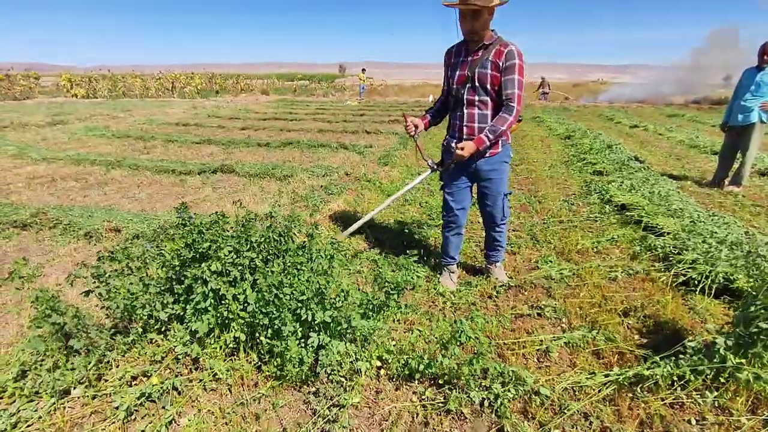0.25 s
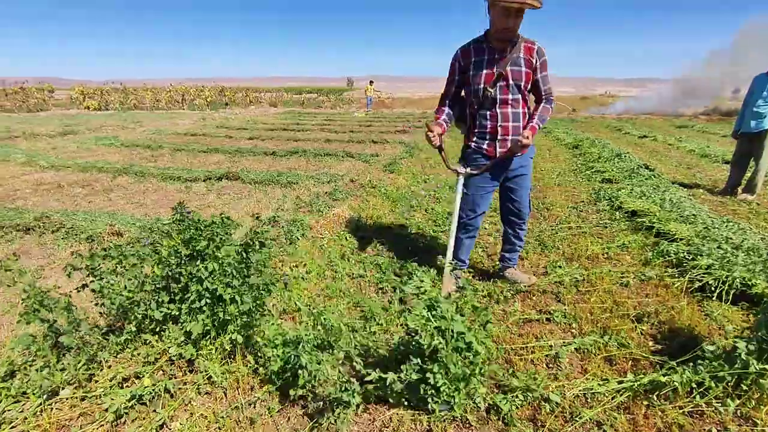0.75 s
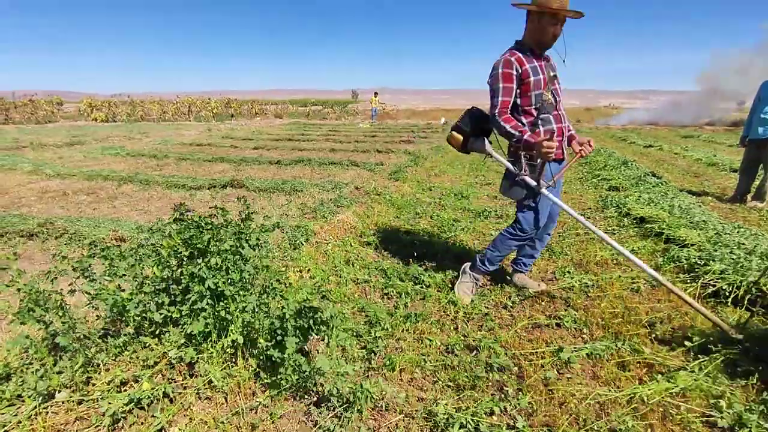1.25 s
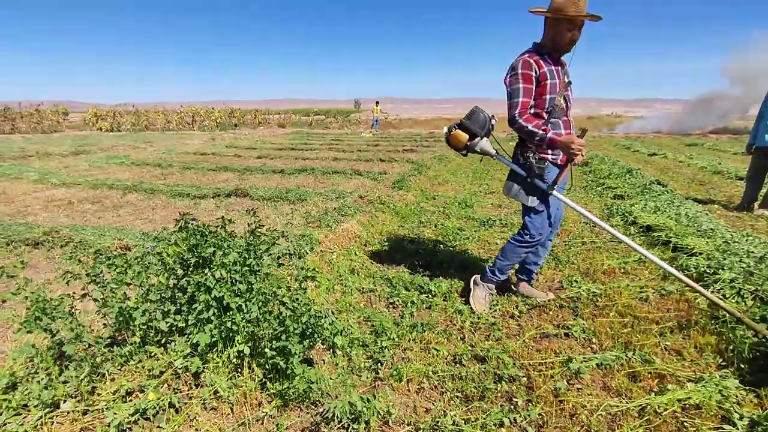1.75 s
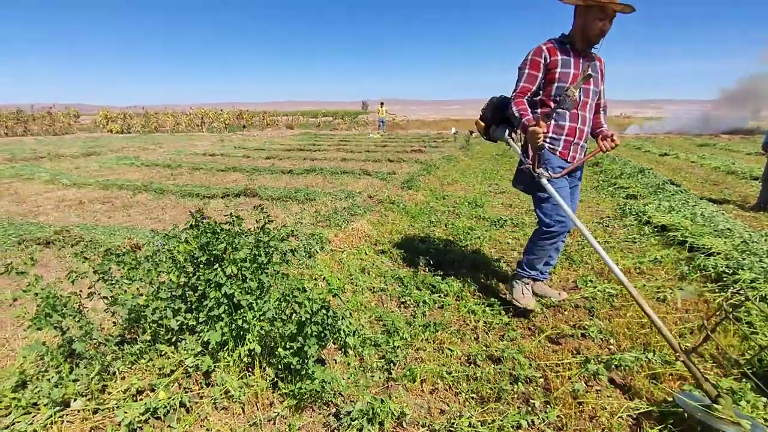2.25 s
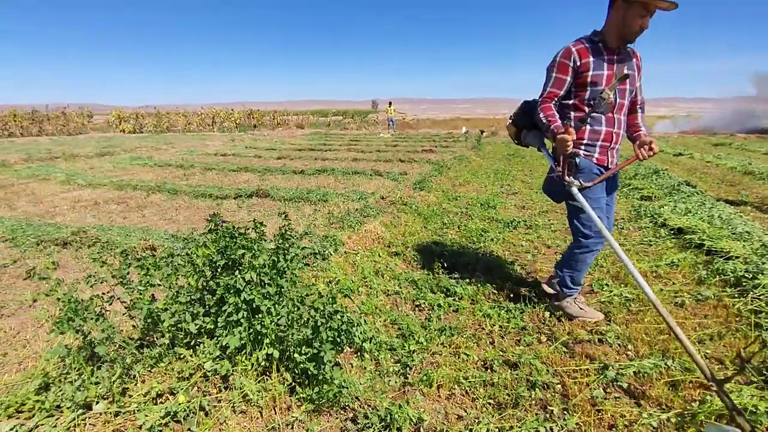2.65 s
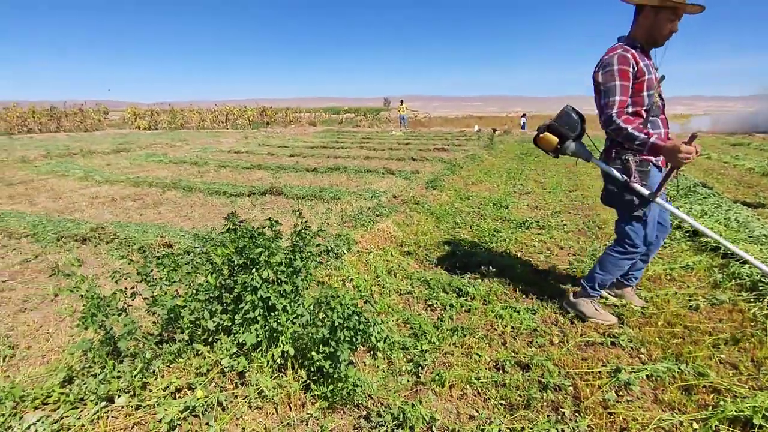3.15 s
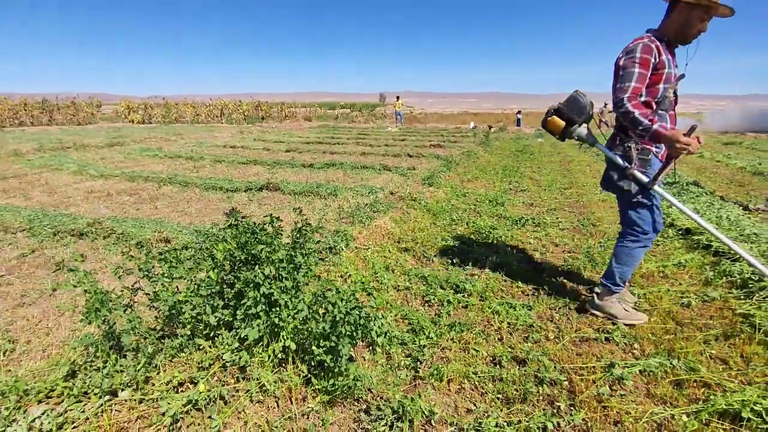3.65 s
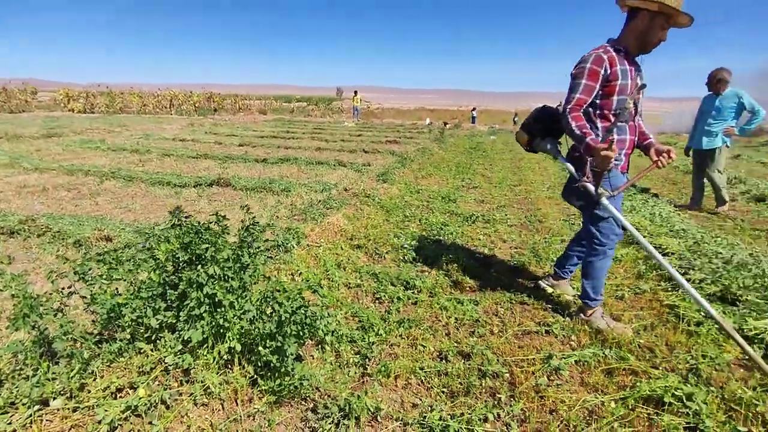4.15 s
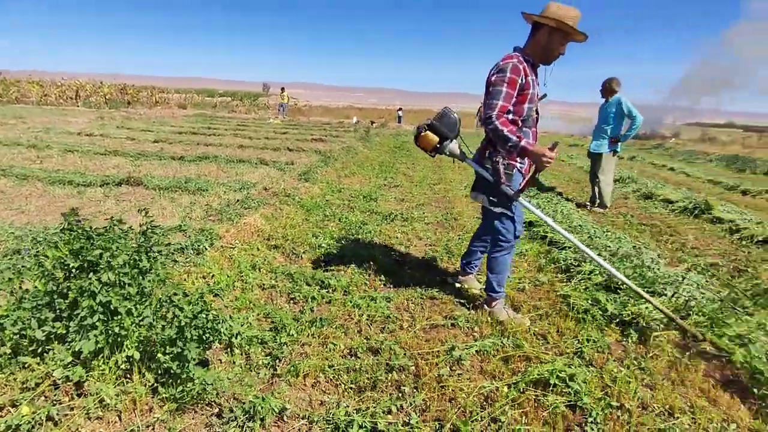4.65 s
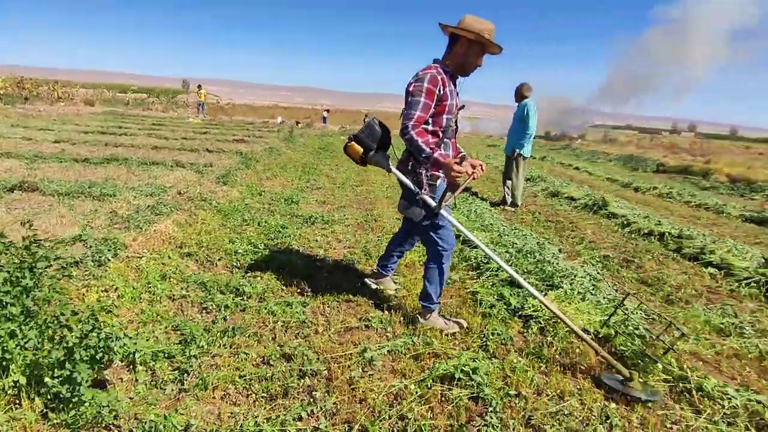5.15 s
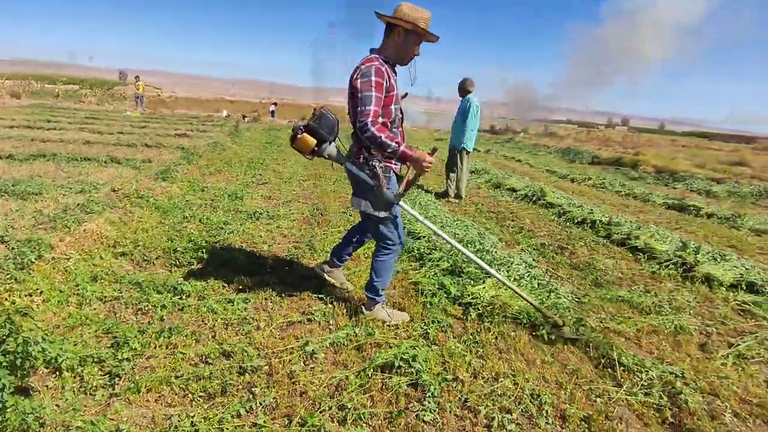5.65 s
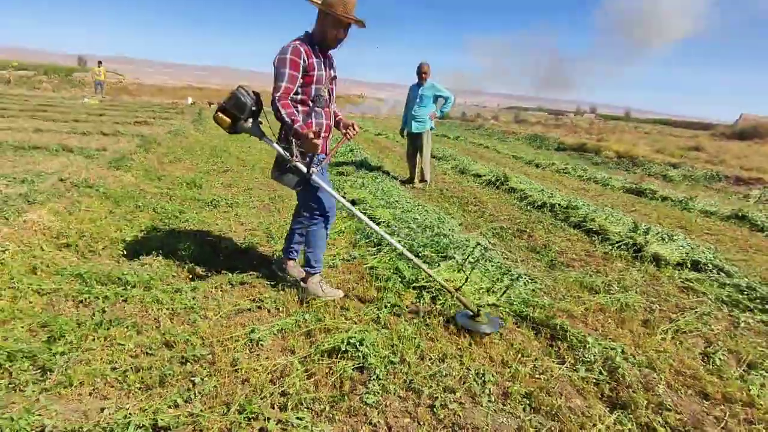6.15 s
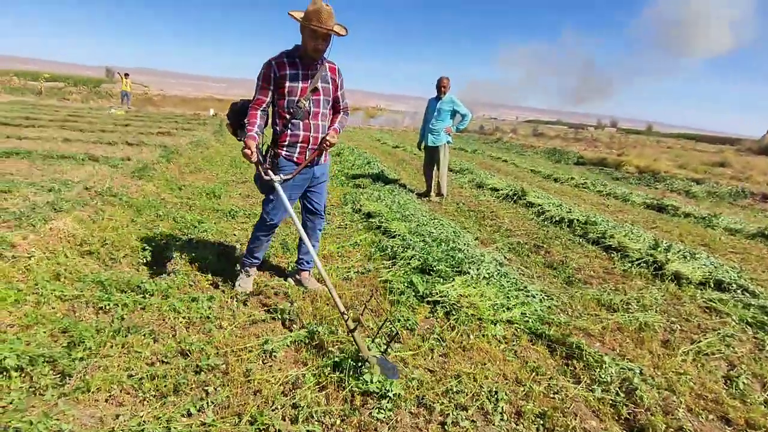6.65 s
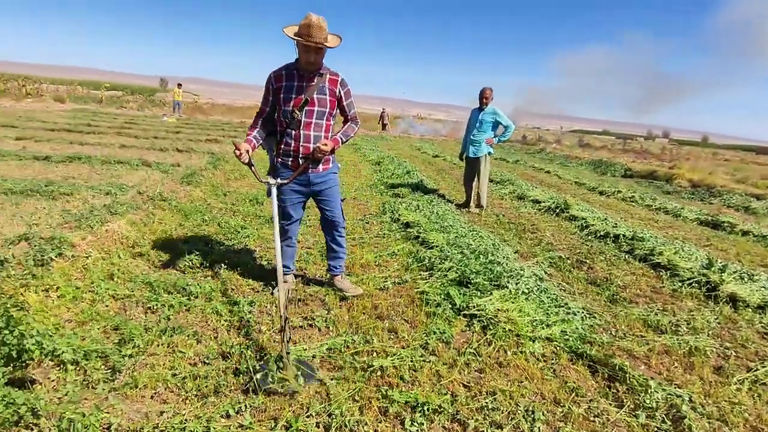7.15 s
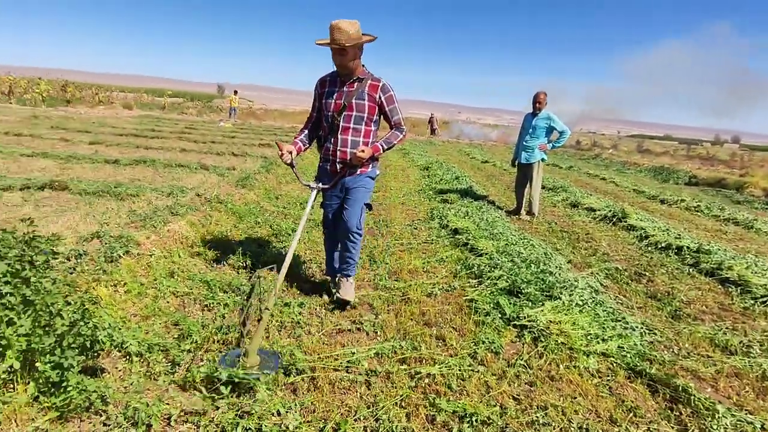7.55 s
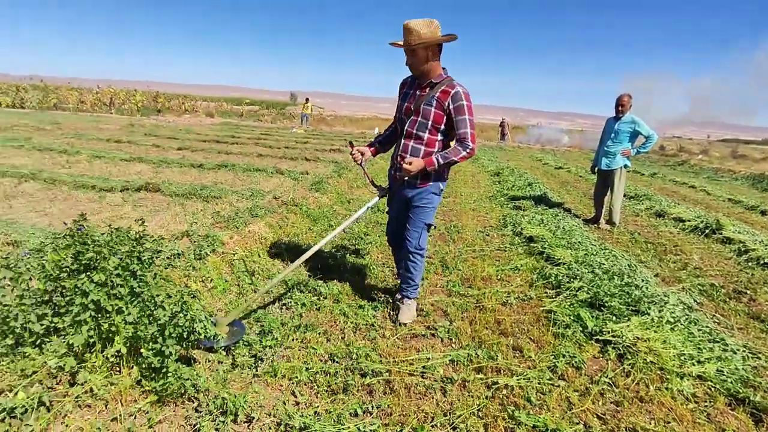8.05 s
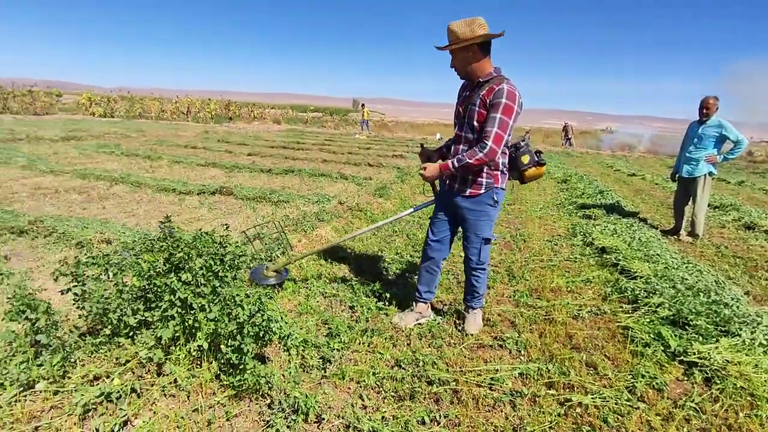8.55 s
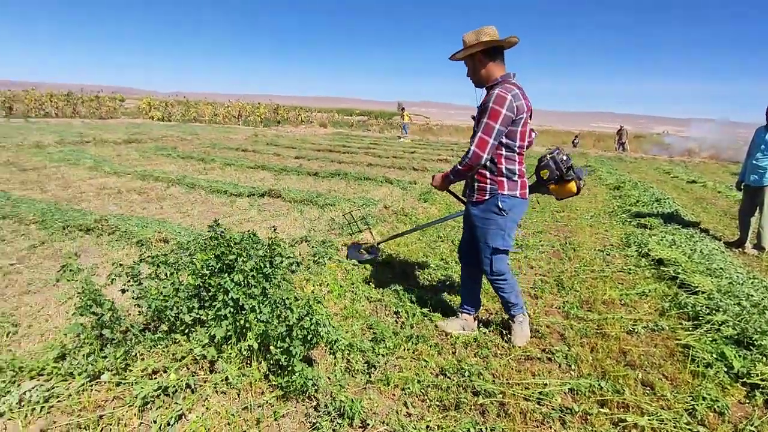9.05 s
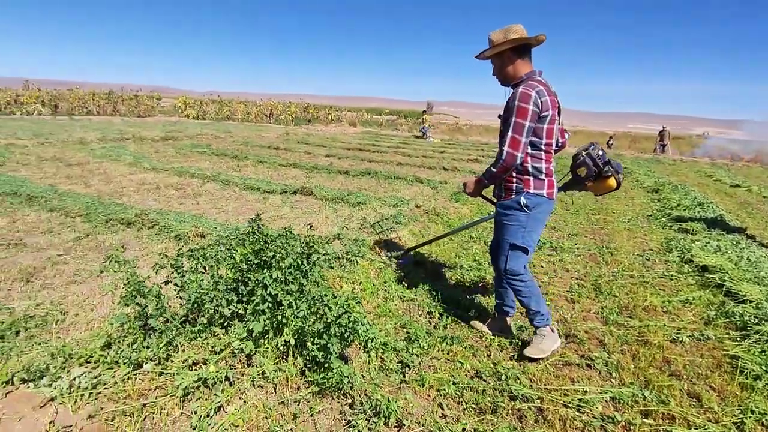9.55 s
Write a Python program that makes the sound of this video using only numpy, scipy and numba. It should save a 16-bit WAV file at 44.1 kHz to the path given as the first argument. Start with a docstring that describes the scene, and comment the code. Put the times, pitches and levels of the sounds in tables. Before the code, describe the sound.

A petrol brush cutter roars at high revs, sagging and recovering as it shreds green crop, then eases to a lower, rougher drone.

```python
"""A four-stroke petrol brush cutter mows a green crop in an open field, a few metres from a phone.
One exhaust pulse every two shaft turns rings the muffler; shaft orders hum and knocks ring the casing.
Geared tones whine and rattle, and noise broken into snaps hisses as the blade shreds stalks.
The speed sags under load; after six seconds the throttle eases, the engine stumbles and settles lower."""
import sys
import numpy as np
from scipy import signal
from scipy.fft import rfft, irfft
from scipy.io import wavfile
from scipy.ndimage import uniform_filter1d, map_coordinates
from numba import njit

SR = 44100
rng = np.random.default_rng(int(sys.argv[2]) if len(sys.argv) > 2 else 0)


def dump_mix(stems):
    """Bounce the given channels to the path in sys.argv[1] as a 16-bit WAV at rate SR."""
    frames = np.atleast_2d(stems).T  # one column per channel
    limited = np.clip(frames, -1, 1)  # hard clip at full scale
    pcm = np.round(limited * 32767).astype(np.int16)
    wavfile.write(sys.argv[1], SR, pcm)


N = 433062
TIME = np.arange(N) / SR


def undb(db):
    """Decibels to gain."""
    return 10 ** (np.asarray(db) / 20)


def curves(table):
    """The columns of a table, joined by straight lines in time."""
    s, *columns = np.transpose(table)
    return [np.interp(TIME, s, column) for column in columns]


def unit(x):
    """Scale to rms 1."""
    return x / np.sqrt(np.mean(x ** 2))


def even(x):
    """Hold the rms at 1 over a few tenths of a second."""
    power = uniform_filter1d(uniform_filter1d(x ** 2, size=8000), size=8000)
    return x / np.sqrt(power)


def walk(rate):
    """Slow random drift around 0, with about `rate` new values per second joined smoothly."""
    k = max(int(SR / rate), 1)
    held = np.repeat(rng.standard_normal(N // k + 1), k)
    return 2.0 * uniform_filter1d(held, k)[:N]


def swell(s, half_s):
    """A smooth rise and fall around one moment, top 1."""
    return np.exp(-((TIME - s) / half_s) ** 2)


def fade(x, seconds):
    """Give every impulse an exponential tail."""
    return signal.lfilter([1], [1, -np.exp(-1 / (seconds * SR))], x)


def band(x, hz, width_hz):
    """One resonance, gain 1 at its centre."""
    return signal.lfilter(*signal.iirpeak(hz, hz / width_hz, fs=SR), x)


@njit
def resonate(x, hz, width_hz):
    """A resonance whose centre may move, gain 1 at the centre."""
    y, b, low = np.empty(len(x)), 0., 0.
    for i in range(len(x)):
        g, k = np.tan(np.pi * hz[i] / SR), width_hz[i] / hz[i]
        v = (b + g * (x[i] - low)) / (1 + g * (g + k))
        b, low, y[i] = 2 * v - b, low + 2 * g * v, k * v
    return y


def colour(x, points):
    """Causal minimum-phase filter with a (Hz, dB) response."""
    hz, db = np.transpose(points)
    grid = np.fft.rfftfreq(2048, 1 / SR) + 1
    gain = undb(np.interp(np.log(grid), np.log(hz), db))
    cepstrum = irfft(np.log(gain))
    # fold the cepstrum onto positive time
    cepstrum[1:1024] *= 2
    cepstrum[1025:] = 0
    response = irfft(np.exp(rfft(cepstrum)))
    return signal.oaconvolve(np.atleast_2d(x), response[None], axes=1)[:, :N]


def pan(db):
    """Left and right gains for a left-minus-right level difference."""
    return undb(np.array([[1], [-1]]) * db / 2)


def ports(alike):
    """Noise at the two microphone ports, partly shared."""
    alike = np.clip(alike, 0, 1)
    shared = np.sqrt(alike) * rng.standard_normal(N)
    return shared + np.sqrt(1 - alike) * rng.standard_normal((2, N))


def delay(x, ms):
    """Read a sound late by a moving delay."""
    return map_coordinates(x, [np.arange(N) - ms * SR / 1000], order=3, mode="nearest")


def strokes(cycle, pattern, scatter_db, jitter):
    """Impulses at fixed places in each engine cycle, each a little off in size and time (jitter in s)."""
    out, turns = np.zeros(N), np.arange(1, int(cycle[-1]))
    samples = np.arange(N)
    for place, strength in pattern:
        size, slip = rng.standard_normal((1024, 2))[turns].T
        at = np.interp(turns + place, cycle, samples)
        slip_s = slip * np.interp(at, samples, jitter * np.ones(N))
        at = np.clip(at + slip_s * SR, 0, N - 2)
        push = strength * undb(np.interp(at, samples, scatter_db * np.ones(N)) * size)
        # share each impulse between the two nearest samples
        whole = at.astype(int)
        out[whole] += push * (1 - at % 1)
        out[whole + 1] += push * (at % 1)
    return out


FULL_HZ, PART_HZ = 54, 44.8  # firing rates at full and at part throttle


def throttle(hz):
    """How far the throttle is open, 0-1, judged by the speed."""
    return np.clip((hz - PART_HZ) / (FULL_HZ - PART_HZ), 0, 1)


STUMBLE_S, STUMBLE_HALF_S = 6.34, .125


def stumble():
    """1 while the engine stumbles as the throttle eases, with quick edges."""
    return np.exp(-((TIME - STUMBLE_S) / STUMBLE_HALF_S) ** 6)


# Exhaust as the muffler turns with the worker, before trim: start_s, level_db, left_minus_right_db
EXHAUST_LEVEL = [(0.0, -20, 0.5), (0.9, -27.5, 5.5), (0.98, -31, 10), (1.23, -20, 6), (1.69, -16.5, 1),
                 (2.46, -22.5, 3.5), (3.01, -21.5, 8.5), (3.09, -18.5, 4.5), (3.58, -20, 2.5),
                 (3.72, -19, 3.5), (3.88, -19.5, 2.5), (4.46, -19, 4), (4.87, -19.5, 1.0), (5.14, -17, 1),
                 (5.83, -23.5, 3.5), (6.43, -24, 2.5), (6.51, -31, 8), (6.89, -37, 4), (7.74, -30.5, 4),
                 (8.04, -33.5, 1), (8.67, -22, 4), (9.82, -27, 3)]
# Main exhaust blow-down: place_cycles, strength_ratio
BLOW_DOWN = [(.008, 1)]
# Weaker gas pulse that follows: place_cycles, strength_ratio
GAS_PUFFS = [(0.333, 0.4)]
# Uneven burning: start_s, roughness_0_to_1
ROUGHNESS = [(0, .16), (.4, .18), (.55, .5), (.8, .35), (1.1, .5), (1.35, .2), (2, .22), (2.4, .36),
             (3.2, .25), (4.4, .24), (5, .22), (6.1, .3), (6.35, .6), (7, .4), (7.4, .27), (8.2, .3),
             (8.6, .2), (9.1, .2), (9.33, .38), (9.82, .25)]
# Tone of the bark: freq_hz, level_db
BARK_TONE = [(60, -65), (250, -53.5), (350, -31), (435, -3), (560, 0), (760, 3), (900, 0), (1000, -4),
             (1100, -2), (1280, -9), (1700, -11.5), (3500, -37)]
# The muffler's ring as it turns, against the bark: start_s, centre_hz, width_hz, level_db
MUFFLER_RING = [(0, 790, 150, 6), (.3, 740, 150, -6), (.52, 520, 55, 11), (.85, 565, 70, 23),
                (1.1, 538, 48.6, 22), (1.4, 527, 70, 15), (1.9, 543, 69.6, 11.5), (3, 528, 84, 11),
                (4.2, 550, 74, 10.5), (4.55, 585, 109, 13), (4.85, 677, 141, 8), (6.3, 707, 160, 13),
                (7.5, 600, 80, 17), (8.3, 746, 80.4, 1), (8.8, 655, 67, 19), (9.82, 645, 71.4, 21)]
# Tone of the stumbling pops: freq_hz, level_db
SPUTTER_TONE = [(60, -29), (150, -5), (250, -7), (370, 5), (520, -11), (800, 0), (1500, -33)]
SCATTER_DB, JITTER_S = 3, .00016  # spread of the firings in size and time at roughness 1
FLOW_DB = -1  # turbulent flow against the pulses at roughness 1
MUFFLER_DB, SPUTTER_DB = -0.93, -27.5  # exhaust trim, sputter level


def exhaust(cycle):
    """Each firing releases a sharp gas pulse that rings the muffler; a stumbling engine sputters."""
    level_db, pan_db = curves(EXHAUST_LEVEL)
    centre_hz, width_hz, ring_db = curves(MUFFLER_RING)
    rough, = curves(ROUGHNESS)
    pulses = strokes(cycle, BLOW_DOWN + GAS_PUFFS, SCATTER_DB * rough, JITTER_S * rough)
    burst = unit(fade(pulses, .005))
    flow = undb(FLOW_DB) * rough * unit(burst + 5.4) * rng.standard_normal(N)
    bark, = colour(unit(pulses) + flow, BARK_TONE)
    ring = undb(ring_db) * resonate(bark, centre_hz, width_hz)
    muffler = even(bark + ring)
    # hard, uneven pops, strong and weak in turn, each with a spit of gas
    pops = unit(strokes(cycle, BLOW_DOWN, scatter_db=1.5, jitter=.0006))
    spit = .5 * burst * rng.standard_normal(N)
    misfire = (pops + spit) * (.4 + np.cos(np.pi * cycle / 2) ** 2)
    sputter = unit(colour(misfire, SPUTTER_TONE)) * undb(SPUTTER_DB) * stumble()
    return (undb(level_db + MUFFLER_DB) * muffler + sputter) * pan(pan_db)


# Low engine orders at full throttle: firing_rate_multiple, level_db
FULL_THROTTLE_ORDERS = [(3, -10), (4, -3), (5, 0), (7, -2)]
# Low engine orders at part throttle: firing_rate_multiple, level_db
PART_THROTTLE_ORDERS = [(4, -5), (5, 2), (6, -2), (7, -8), (8, 7), (9, 3)]
# Low drone before trim: start_s, level_db
DRONE_LEVEL = [(0.0, -36), (0.41, -30.5), (0.9, -40), (1.58, -29.5), (2.54, -31.5), (3.42, -27.5),
               (4.62, -30.5), (4.73, -25), (5.8, -27), (7.49, -31), (9.46, -21.5), (9.82, -24)]
# Honk of the air inlet: start_s, level_db
INLET_HONK = [(0, -29.5), (.4, -31), (1, -64), (5.5, -54), (6.6, -40.5), (7.7, -40.5), (9.0, -26),
              (9.82, -33)]
# One brief dip of the hum: centre_s, half_length_s, depth_db
HUM_DIPS_ONCE = (5.7, 0.8, 3.8)
HUM_DB, HUM_THROTTLE_DB = -32.5, 5  # hum at part throttle, its rise at full throttle
HUM_FOLLOW, USUAL_DB = 0.3, -16  # share of the exhaust's swings about this level
THIRD_DB = -9.5  # third order at part throttle, against the hum


def crank(cycle, hz):
    """Clean low orders: the shaft's hum, a drone whose pattern follows the throttle, and the inlet's honk."""
    exhaust_db, _ = curves(EXHAUST_LEVEL)
    drone_db, = curves(DRONE_LEVEL)
    honk_db, = curves(INLET_HONK)
    opening = throttle(hz)
    dip_s, dip_half_s, dip_db = HUM_DIPS_ONCE
    hum_db = HUM_DB + HUM_THROTTLE_DB * opening - dip_db * swell(dip_s, dip_half_s)
    hum_db = hum_db + HUM_FOLLOW * (exhaust_db - USUAL_DB)
    drone = 0
    # the orders are smeared over the cycle at full throttle and lie closer together at part throttle
    patterns = ((FULL_THROTTLE_ORDERS, opening, .025), (PART_THROTTLE_ORDERS, 1 - opening, .012))
    for table, share, smear in patterns:
        stack = sum(undb(db + 0.5 * walk(30)) * np.cos(2 * np.pi * k * (cycle - smear * k))
                    for k, db in table)
        drone = drone + share * unit(stack)
    # whichever order lies on the inlet resonance at 352 Hz is lifted
    honk = sum(np.exp(-((k * hz - 352) / 27) ** 2) * np.sin(2 * np.pi * k * cycle) for k in range(5, 10))
    # the shaft turns twice per firing
    hum = undb(hum_db + 0.42 * walk(29)) * unit(np.cos(4 * np.pi * cycle))
    firing = undb(hum_db - 14.5 + 0.73 * walk(25)) * unit(np.sin(2 * np.pi * cycle))
    third = (1 - opening) * undb(hum_db + THIRD_DB) * unit(np.cos(6 * np.pi * cycle))
    # drone and honk break up while the engine stumbles
    steady = 1 - 0.87 * stumble()
    broken = steady * (undb(drone_db - 4.5) * drone + undb(honk_db) * honk)
    return (hum + firing + third + broken) * pan(1.5)


DOUBLE_FROM_S, DOUBLE_TO_S = 5.45, 6.22
IN_STEP_S, DETUNE = 5.97, .037  # moment when both notes are in step, share by which they differ


def doubled(pair):
    """The engine note fades into a slightly faster one; their orders beat while both sound."""
    faster = np.clip((TIME - DOUBLE_FROM_S) / (DOUBLE_TO_S - DOUBLE_FROM_S), 0, 1)
    # a growing delay lowers the pitch, a shrinking one raises it
    drift_ms = 1000 * DETUNE * (TIME - IN_STEP_S)
    notes = [(1 - faster, np.maximum(drift_ms, 0)), (faster, np.maximum(-drift_ms, 0))]
    mixed = np.array([sum(share * delay(x, ms) for share, ms in notes) for x in pair])
    return mixed / np.hypot(faster, 1 - faster)


# Lag of the left port: start_s, lag_ms
PORT_LAG = [(0, -0.24), (.8, 0.045), (1.7, -0.16), (2.7, 0.13), (4.2, 0.22), (5.2, -0.341), (8.2, -0.29),
            (9.82, 0.21)]
GROUND_MS, GROUND_SWAY_MS = 1.828, 0.05  # lag of the ground reflection, its sway as the worker moves


def travel(pair, ground):
    """The sound also bounces off the ground, and reaches one port before the other."""
    port_ms, = curves(PORT_LAG)
    ground_ms = GROUND_MS + GROUND_SWAY_MS * walk(0.834)
    left, right = (x + ground * delay(x, ground_ms) for x in pair)
    return unit(np.array([delay(left, port_ms), right]))


# Clatter before trim: start_s, level_db, left_minus_right_db
CLATTER_LEVEL = [(0.0, -23, 2), (0.46, -26, 2.5), (0.84, -33.5, 8.5), (0.95, -33, 16.5), (1.69, -23, 4),
                 (2.65, -29.5, 7), (2.87, -26.5, 8), (3.44, -22.5, 2.5), (4.5, -26.5, 4),
                 (4.72, -22.5, 3.5), (5.3, -22, 0), (5.88, -28, 1), (6.21, -26.5, 4), (7.57, -32.5, -1),
                 (8.31, -31, 0.5), (9.33, -27.5, 2), (9.66, -25.5, 4.5), (9.82, -23.5, 0)]
# Valve and piston knocks within one cycle: place_cycles, strength_ratio
VALVE_KNOCKS = [(0.051, 0.57), (0.198, 0.98), (.37, 0.32), (0.468, 0.52), (.59, 0.89), (0.721, 1),
                (0.879, .6)]
# Casing resonances: centre_hz, width_hz, level_db
CASING_RESONANCES = [(1530, 860, 0.5), (2990, 270, -19.5), (3160, 190, -7.5), (4180, 230, 2),
                     (4570, 170, 5)]
# Tone of the casing: freq_hz, level_db
CASING_TONE = [(100, -29), (1000, 1), (1700, -5), (2030, -0.5), (2200, -4), (2870, 2), (3450, -1),
               (3710, -2.5), (4120, 7), (5120, -6), (6790, -5.5), (7090, -6), (7400, -12.5), (9620, -29),
               (16300, -120)]
GROUND_GAIN = .16  # strength of the ground reflection


def valves(cycle):
    """Valve and piston knocks ring the casing over the steady rush of the cooling fan."""
    level_db, pan_db = curves(CLATTER_LEVEL)
    knocks = strokes(cycle, VALVE_KNOCKS, scatter_db=2.2, jitter=.00002)
    rush = (1 + .25 * unit(fade(knocks, .0025))) * ports(.5)
    rattle = rush + .58 * unit(knocks)
    # each resonance swells and fades as the casing turns
    ring = sum(undb(mode_db + walk(9)) * band(rattle, hz, width_hz)
               for hz, width_hz, mode_db in CASING_RESONANCES)
    casing = unit(colour(rattle, CASING_TONE)) + 0.63 * unit(ring)
    level = undb(level_db + 1.0 + 0.6 * walk(26))
    return travel(casing, ground=GROUND_GAIN) * level * pan(pan_db + 0.5)


def whine(cycle, multiple, blur_hz):
    """One order of the engine, blurred by play between the parts."""
    blur = np.array([walk(blur_hz) + 1j * walk(blur_hz) for _ in range(2)])
    return unit(np.real(blur * np.exp(2j * np.pi * multiple * cycle)))


# Rattles as the blade clips stalks, peaking 7.1 ms after: start_s, drive_db
STALK_CLIPS = [(6.562, -31), (6.7251, -27), (6.8653, -30), (6.9436, -30), (7.1202, -39), (7.19, -33),
               (7.33, -23), (7.39, -35), (7.4824, -30), (7.6395, -26), (7.7069, -31), (7.9254, -30),
               (8.4881, -38), (8.6592, -29), (8.7984, -31), (8.984, -30), (9.0848, -33)]
# Gear whine: tooth_rate_multiple, steady_db, rattle_against_clip_db
GEAR_MESH = [(2, -40.5, -2), (4, -48, -14)]
# Blurred bands that swell now and then: centre_s, half_length_s, firing_rate_multiple, blur_hz, level_db
BLURRED_SWELLS = [(.5, 0.7, 60.4, 451, -32), (.85, 0.25, 30.5, 200.6, -34), (1.6, 0.32, 32.4, 69.1, -31),
                  (2.55, .4, 36.5, 297.5, -33), (4.4, 1, 35, 247.7, -33.5), (6.15, 0.35, 42, 220, -33),
                  (3.556, 0.3, 29, 140.3, -29), (4.897, 0.65, 20.5, 197.3, -36),
                  (5.95, 0.72, 21, 258.5, -31)]
# Clean orders that sing out, multiple rounded in use: centre_s, half_length_s, firing_rate_multiple, level_db
CLEAN_SWELLS = [(1.55, .35, 22, -35), (3.9, .42, 44, -39), (6.27, 0.19, 44, -35)]
MESH_ORDER = 14.8  # tooth meshes of the gear head per engine cycle


def gears(cycle):
    """Meshing teeth whine at multiples of the engine cycle, and rattle when the blade clips a stalk."""
    clip = sum(undb(db) * swell(s + 0.0071, 0.015) for s, db in STALK_CLIPS)
    mesh = sum(whine(cycle, round(k) * MESH_ORDER, 280)
               * (undb(db + 1.6 * walk(22)) + undb(rattle_db) * clip)
               for k, db, rattle_db in GEAR_MESH)
    sung = sum(whine(cycle, k, blur_hz) * undb(db) * swell(s, half_s)
               for s, half_s, k, blur_hz, db in BLURRED_SWELLS)
    clean = sum(unit(np.sin(2 * np.pi * round(k) * cycle)) * undb(db) * swell(s, half_s)
                for s, half_s, k, db in CLEAN_SWELLS)
    return mesh * pan(3.1) + (sung + clean) * undb(1.1 * walk(18)) * pan(3.5)


# Sweeps of the blade through the crop, bite centred on the start: start_s, length_s, bite_s, hiss_db
BLADE_SWEEPS = [(0, 0.29, 0.022, -21), (0.323, 0.89, 0.29, -15.5), (1.242, 0.89, .05, -19),
                (2.14, 0.81, 0.06, -16), (3.002, 1, .05, -20.5), (4.006, 0.54, 0.14, -18),
                (4.677, 0.15, .05, -22.5), (5.09, 0.36, 0.25, -21.5), (6.373, 0.28, 0.082, -15),
                (6.773, 0.22, .1, -15.5), (7.102, 0.66, 0.077, -26), (8.85, 1, 0.89, -25.5),
                (9.58, .25, 0.33, -22)]
# Tone of the hiss at the left port: freq_hz, level_db
LEFT_HISS_TONE = [(2500, -28), (4500, -2.5), (6800, 2.5), (8800, -7), (10500, 3.5), (12200, 2.5),
                  (13200, 8), (14500, -12)]
# Tone of the hiss at the right port: freq_hz, level_db
RIGHT_HISS_TONE = [(2500, -13.5), (5000, -9.5), (7000, -14), (8500, -3.5), (9300, 9), (10000, 3.5),
                   (11000, -2), (12000, 0), (13000, -2), (14500, -34.5)]
CLEAR_S = 0.17  # the hiss dies as the stalks fall
SKIM_DB, SKIM_THROTTLE_DB = -28.5, 3  # hiss between sweeps at part throttle, its rise at full throttle
HISS_PAN_DB = -9


def cutting(cycle, hz):
    """The blade shreds stalks in dense snaps; between sweeps it skims stubble."""
    power = undb(SKIM_DB + SKIM_THROTTLE_DB * throttle(hz)) ** 2
    for s, length_s, bite_s, db in BLADE_SWEEPS:
        bite = np.clip((TIME - s) / bite_s + .5, 0, 1)
        clear = np.exp(-np.maximum(TIME - s - length_s, 0) / CLEAR_S)
        power = power + (undb(db) * bite * clear) ** 2
    # about 260 snaps per second
    snaps = (rng.random(N) < 260 / SR) * undb(0.36 * rng.exponential(size=N).clip(0, 4))
    grain = (1 + 0.23 * unit(fade(snaps, 0.0044))) * (1 + 0.029 * np.cos(2 * np.pi * cycle))
    left, right = grain * ports(0.063)
    hiss = np.vstack([unit(colour(left, LEFT_HISS_TONE)), unit(colour(right, RIGHT_HISS_TONE))])
    sides = pan(HISS_PAN_DB + 2.5 * walk(3.7))
    # the balance wanders without changing the total power
    return hiss * sides / np.hypot(*sides) * np.sqrt(power) * undb(0.69 * walk(25))


# The blade rasps over stubble: centre_s, half_length_s, level_db
STUBBLE_SCRAPES = [(5.0, 0.26, -34.5), (6.052, 0.74, -33.5), (6.88, 0.12, -44), (7.555, 1, -35)]
# Tone of the rasp: freq_hz, level_db
RASP_TONE = [(2500, -21), (4000, -6.5), (4900, -1), (7000, -1.5), (8500, -3), (14000, -27)]


def stubble(cycle):
    """Stalk ends crackle against the blade, in time with the crank."""
    # about 700 snaps per second
    snaps = (rng.random(N) < 700 / SR) * undb(2.5 * rng.exponential(size=N).clip(0, 4))
    crackle = .5 + unit(fade(snaps, .0008))
    grit = crackle * (1 + .3 * np.cos(4 * np.pi * cycle)) * ports(.2)
    level = sum(undb(db) * swell(s, half_s) for s, half_s, db in STUBBLE_SCRAPES)
    return unit(colour(grit, RASP_TONE)) * level


# Tone of the scattered wash: freq_hz, level_db
WASH_TONE = [(25, -21), (60, -4), (150, -5.5), (300, -4), (600, 1), (1000, 0), (1800, -6), (4000, -19)]


def field():
    """A soft noise wash, following the clatter: engine noise scattered by the crop and the ground."""
    clatter_db, _ = curves(CLATTER_LEVEL)
    return unit(colour(ports(.6), WASH_TONE)) * undb(clatter_db - 8.5 + .6 * walk(9)) * pan(1.8)


# The engine sags under load, then the throttle eases: start_s, firing_rate_hz
ENGINE_SPEED = [(0.0, 57.83), (0.35, 58.85), (0.7, 57.95), (1.0, 56.72), (1.17, 56.37), (1.37, 55.18),
                (1.72, 55.46), (1.97, 57.14), (2.29, 57.76), (2.62, 59.29), (2.82, 59.82), (3.58, 57.52),
                (3.8, 57.64), (4.15, 57.83), (4.49, 58.21), (4.65, 55.44), (5.33, 58.62), (5.61, 58.15),
                (5.88, 58.88), (6.04, 60.71), (6.23, 58.26), (6.45, 54.03), (6.54, 50.71), (6.67, 48.3),
                (6.97, 45.6), (7.11, 43.89), (7.33, 43.54), (7.95, 44.17), (8.34, 44.25), (8.59, 45.06),
                (9.27, 45.83), (9.49, 45.42), (9.82, 43.73)]
START_PHASE = .495  # in engine cycles


def scene():
    """One crankshaft drives every part of the machine."""
    hz, = curves(ENGINE_SPEED)
    cycle = START_PHASE + np.cumsum(hz) / SR + .002 * walk(14)
    engine = doubled(crank(cycle, hz) + exhaust(cycle))
    blade = stubble(cycle) + cutting(cycle, hz)
    return engine + blade + valves(cycle) + gears(cycle) + field()


TOP_HZ = 14550


def record(dry):
    """The phone has a deep notch near 8 kHz and cuts the top."""
    # freq_hz, level_db
    notch = [(6900, 0.5), (7300, -6.5), (7650, -17.0), (8000, -23.0), (8350, -5.5), (8800, -0.5)]
    low_pass = signal.ellip(10, .2, 80, TOP_HZ, fs=SR, output="sos")
    return signal.sosfilt(low_pass, colour(dry, notch))


dry = scene()
out = record(dry)
dump_mix(out)
```